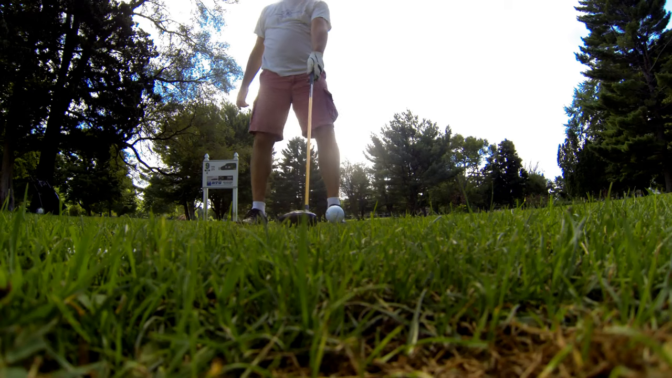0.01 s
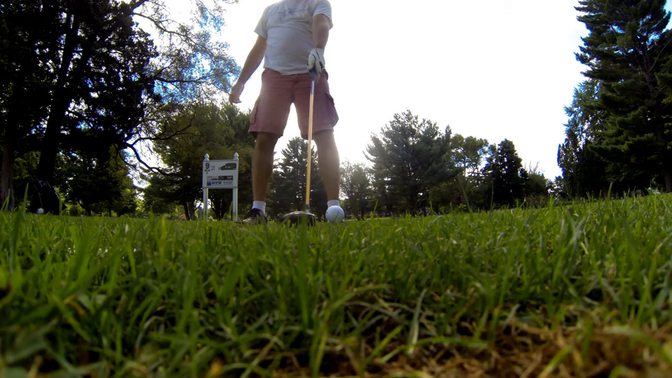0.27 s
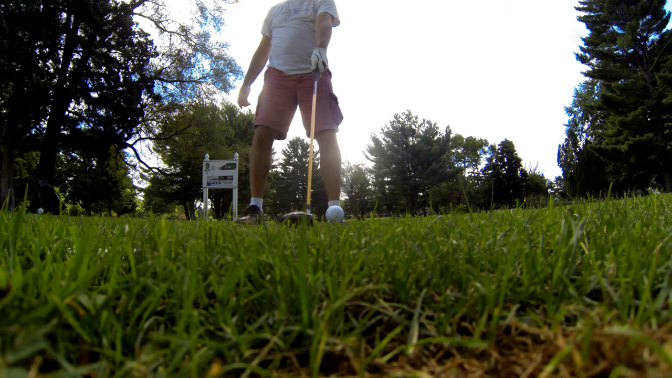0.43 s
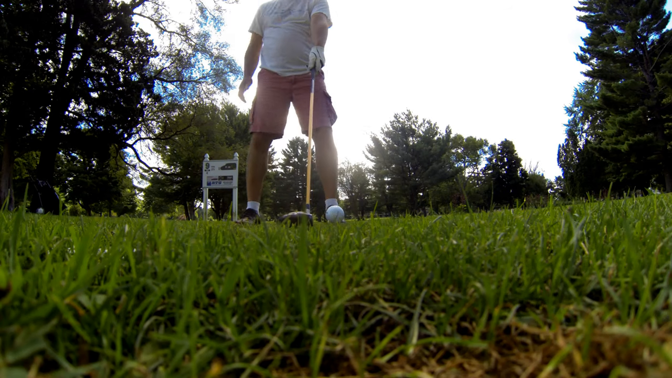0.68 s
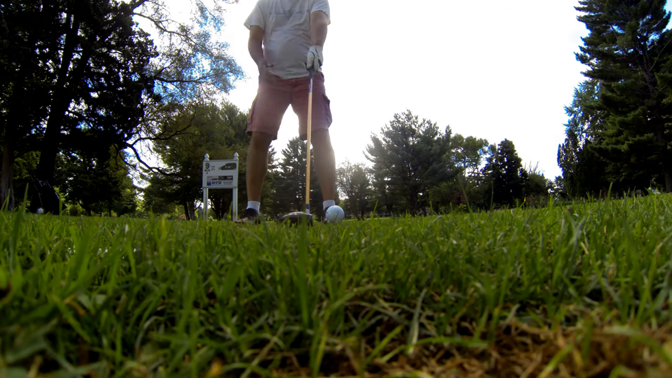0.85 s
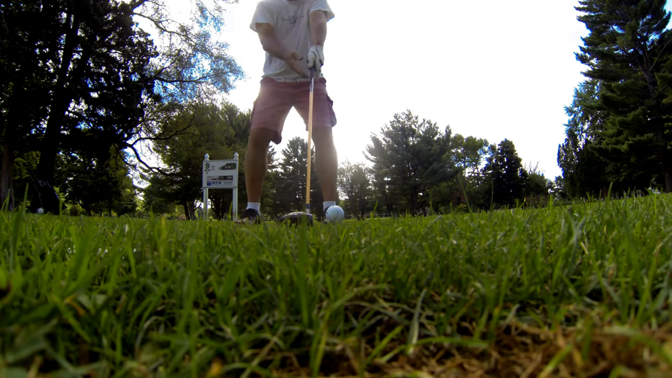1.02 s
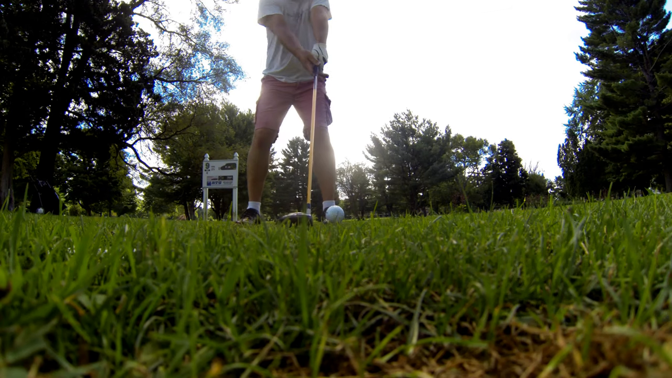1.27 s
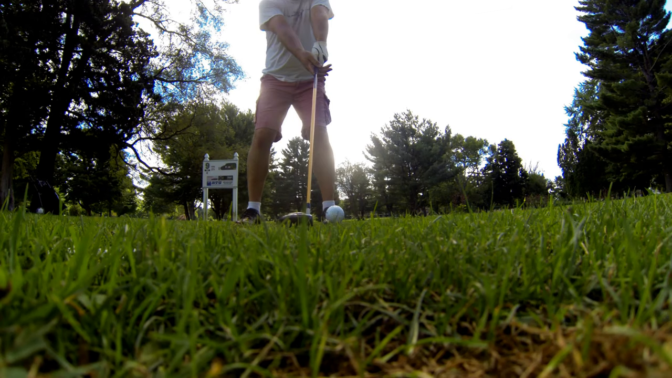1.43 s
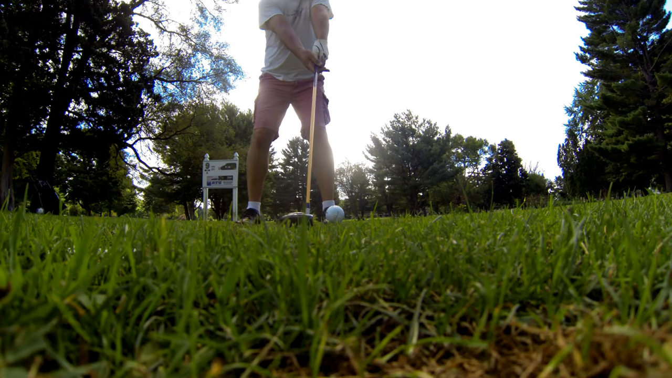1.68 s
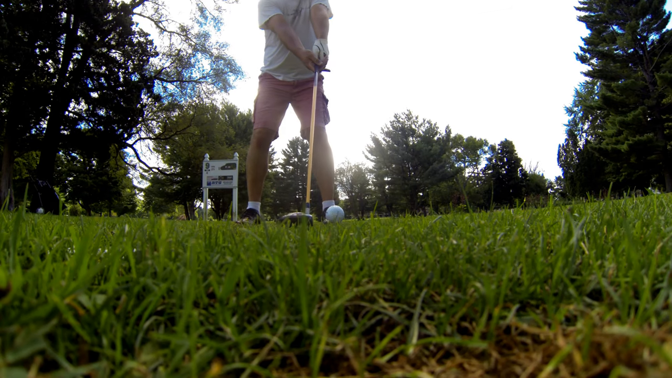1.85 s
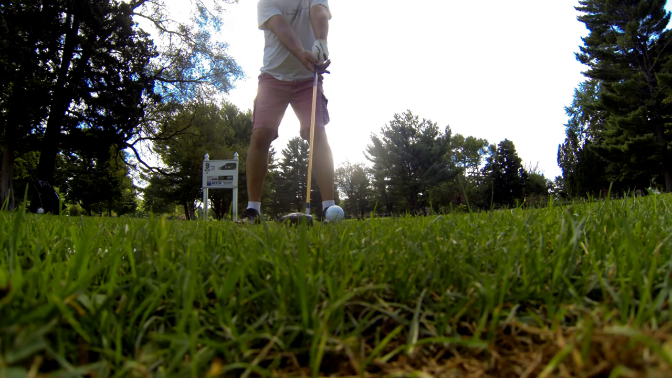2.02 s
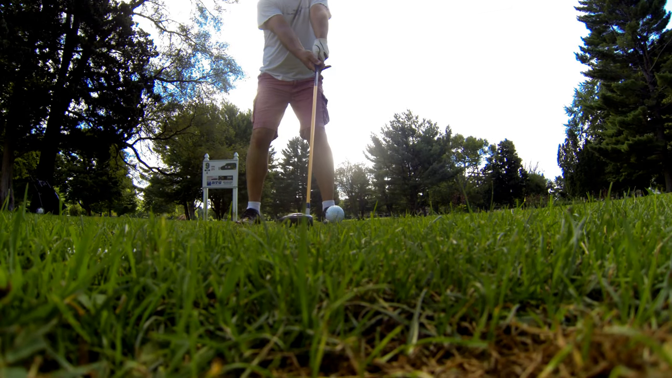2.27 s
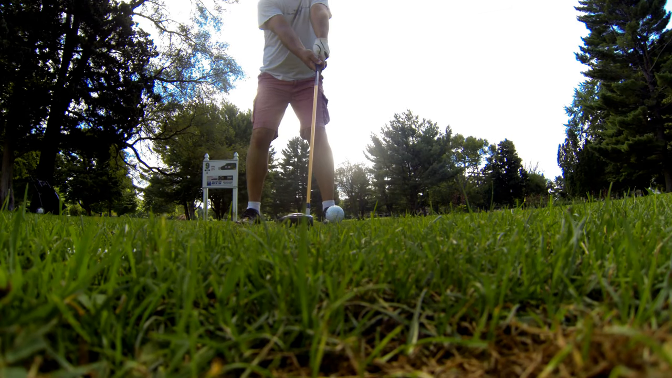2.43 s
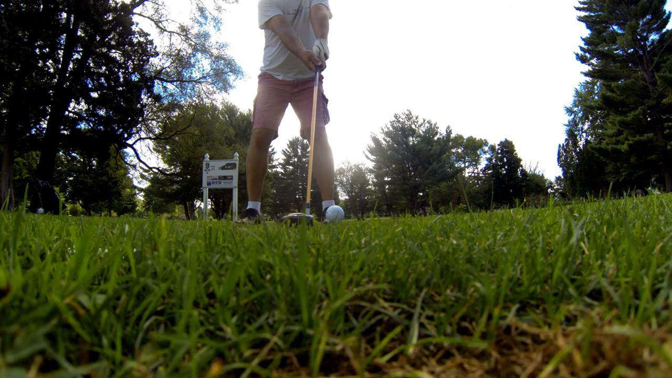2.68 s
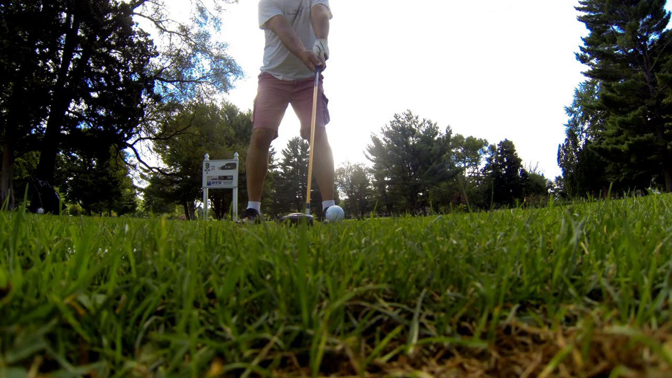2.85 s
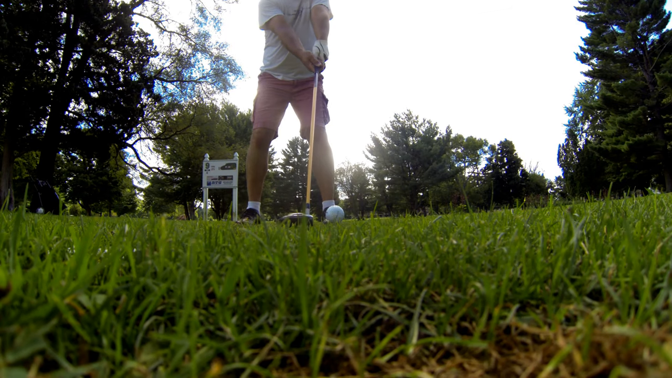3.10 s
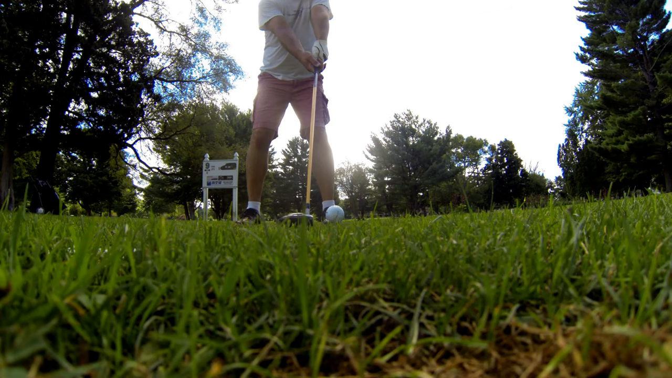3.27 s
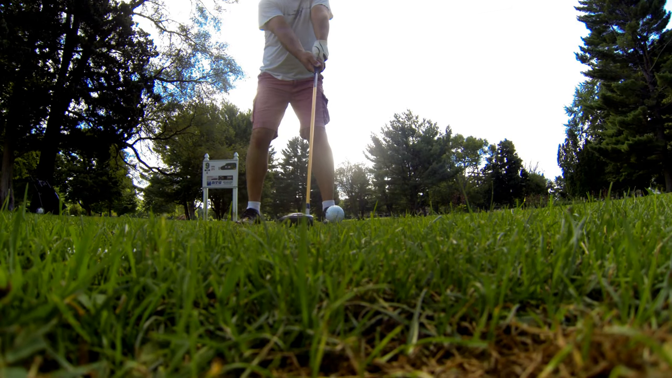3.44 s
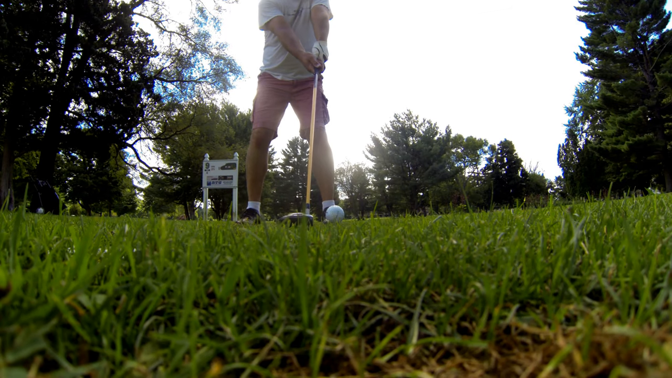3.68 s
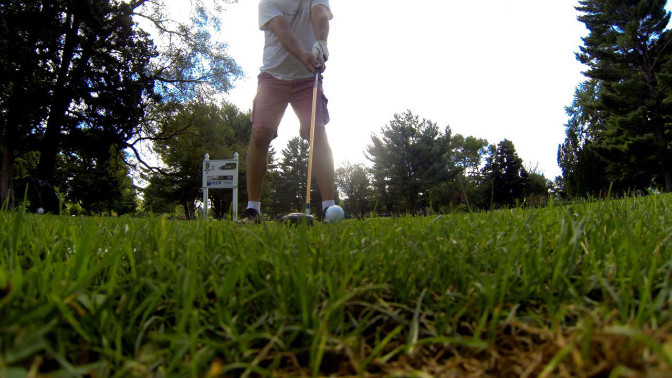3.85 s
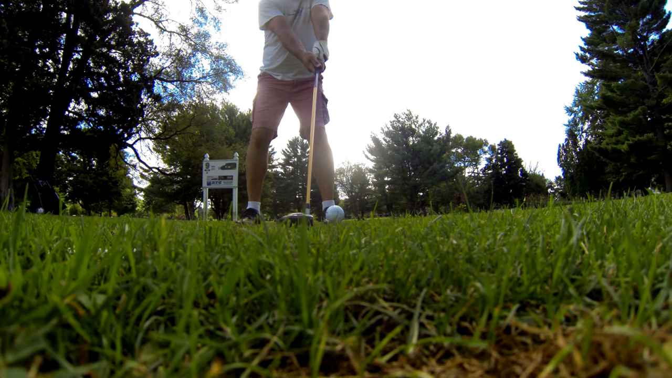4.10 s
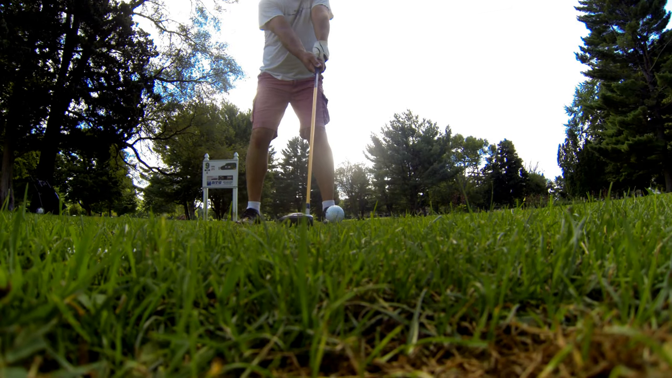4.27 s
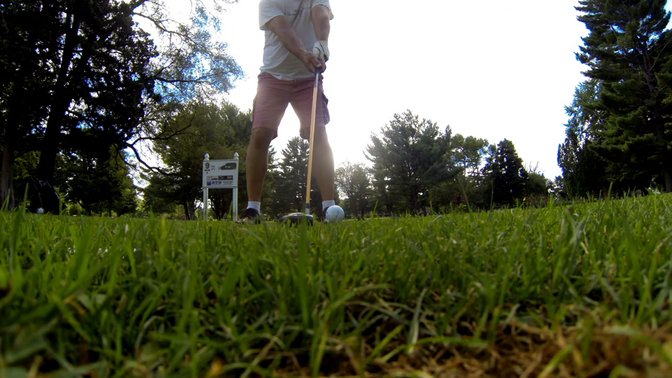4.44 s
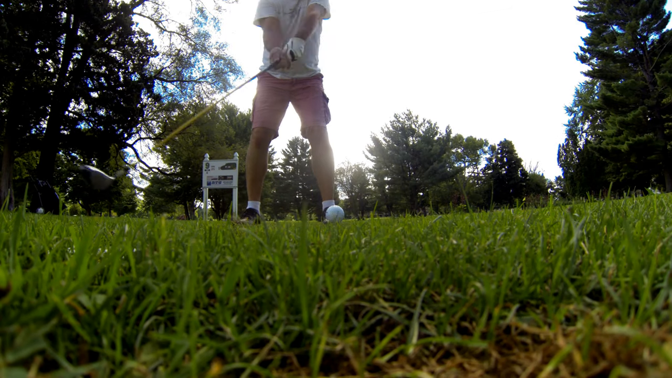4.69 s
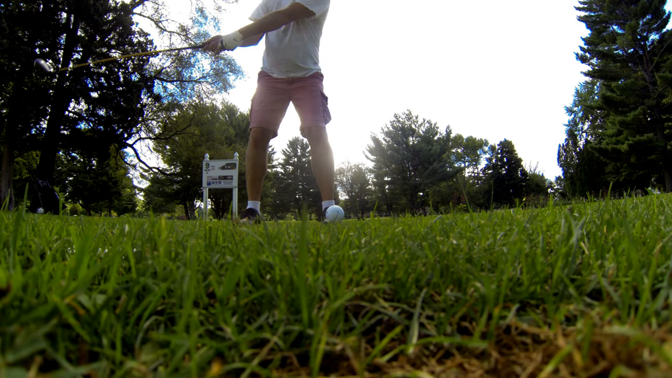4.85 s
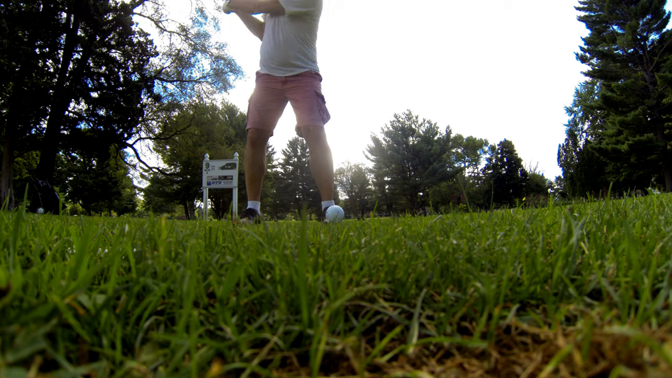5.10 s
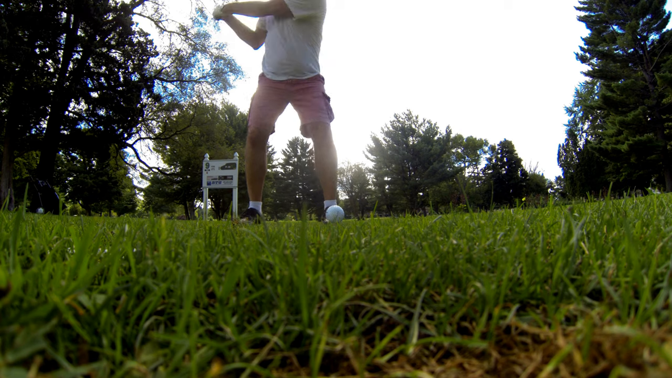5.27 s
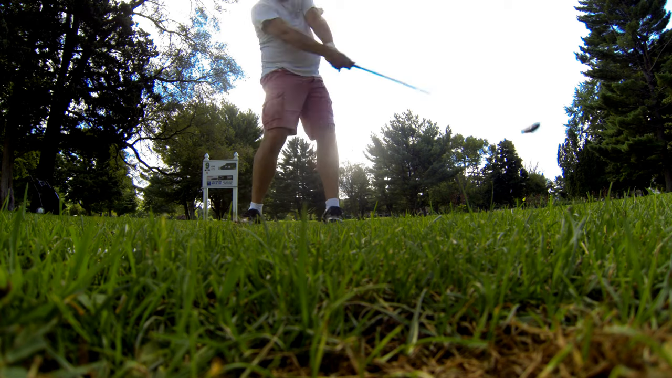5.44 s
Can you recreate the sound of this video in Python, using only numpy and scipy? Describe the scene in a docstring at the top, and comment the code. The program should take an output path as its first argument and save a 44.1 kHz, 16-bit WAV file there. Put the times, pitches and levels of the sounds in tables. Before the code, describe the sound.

A low, steady rumble of far traffic with a wavering hum fills a grassy golf course, with barely audible insects, birds and a thin pulsing whine. A few tiny scuffs come from the grass. Near the end a club whooshes down, hits the ball with a hard, loud crack and a short metallic ring, and trees throw back a bright wash. The microphone lies close by in the grass.

```python
"""Distant traffic rumbles throughout, with a wavering hum, faint insects, birds and a thin pulsing whine.
After a few scuffs in the grass a golf club swishes down, cracks against the ball and rings as it swings away.
Trees return a bright wash. Noise is shaped by its spectrum, the swish follows the speed of the head,
and the crack is a sum of decaying modes with noise, heard close by from a microphone lying in the grass."""
import sys
import numpy as np
from scipy import signal
from scipy.fft import rfft, irfft, next_fast_len
from scipy.io import wavfile

SR = 44100
rng = np.random.default_rng(int(sys.argv[2]) if len(sys.argv) > 2 else 0)


def unload_audio(sound):
    """Save the sound as a 16-bit wav file, at the path given as the first command line argument."""
    columns = np.transpose(np.atleast_2d(sound))
    # keep every value between -1 and 1, then stretch to whole-number steps
    steps = np.round(np.clip(columns, -1, 1) * 32767)
    wavfile.write(sys.argv[1], SR, steps.astype(np.int16))


N = 243431
TIME = np.arange(N) / SR   # s

# Relative spectrum of distant traffic and air: [frequency_hz, density_db]
RUMBLE_SPECTRUM = [(8.8, -59), (15, 1), (33, 1), (143, -2.5), (248, -9), (286, -13), (312, -13.5),
                   (589, -23.5), (810, -25.5), (3970, -45.5), (6120, -48), (7080, -49.5), (10000, -54),
                   (13800, -55.5), (15000, -73)]
RUMBLE_DB, RUMBLE_SWAY_DB = -41, 0.58   # mean level and spread of its slow sway
# Resonances of a far engine hum: [centre_hz, width_hz, level_db]
HUM_BANDS = [(78, 28, -52.5), (111.5, 12, -48.5), (143.4, 15, -48.5), (286.7, 4, -55.5), (443, 4.1, -68.5)]
# Insect buzzes, swelling slowly and stopping short: [start_s, end_s, level_db]
INSECT_BUZZES = [(1.1, 2.38, -78), (3.35, 4.52, -77)]
BUZZ_ATTACK_S, BUZZ_RELEASE_S = 0.46, .07
# Far bird calls, bell-shaped in time: [centre_s, spread_s, pitch_hz, width_hz, peak_level_db]
BIRD_CALLS = [(1.76, .06, 7300, 500, -80), (2.69, 0.0086, 2260, 300, -60.5), (3.01, .05, 7250, 500, -78),
              (4.39, .02, 5500, 200, -79), (4.458, .02, 5490, 70, -66.5), (4.82, .06, 7140, 700, -76.5)]
# Shoes and club shifting in the grass: [centre_s, spread_s, centre_hz, width_hz, peak_level_db]
GRASS_SCUFFS = [(.68, 0.011, 1020, 500, -57), (2.338, 0.0048, 4000, 8000, -67),
                (2.501, 0.0009, 1880, 1500, -55), (2.533, 0.0044, 1500, 1500, -54),
                (2.534, 0.0036, 5500, 6000, -68)]

# Stands of trees that return the crack as a wash: [return_s, level_db]
TREE_STANDS = [(5.26, -40.5), (5.32, -39.5), (5.365, -45)]
WASH_ATTACK_S, WASH_T60_S = 0.0083, 0.87
# Relative spectrum of the crack scattered by foliage: [frequency_hz, density_db]
FOLIAGE_SPECTRUM = [(150, -30), (400, -4), (900, -2), (1900, -6), (2650, -14), (3050, -12), (3300, -11),
                    (3480, -17), (4300, -9), (5800, -3), (8200, -12), (11300, -14), (13500, -22),
                    (15200, -29)]
# Dull echoes of the crack: [centre_s, spread_s, centre_hz, width_hz, peak_level_db]
DULL_ECHOES = [(5.2735, 0.0035, 1120, 1100, -27), (5.298, 0.0025, 1580, 400, -39),
               (5.341, 0.0074, 996, 700, -53), (5.436, 0.014, 1340, 1450, -43)]
# One pitch of the crack lingers among the trees
LINGER_HZ, LINGER_WIDTH_HZ, LINGER_DB, LINGER_T60_S = 3120, 250, -53, 2.2
DULLING_FROM_S, DULLING_S = 5.42, 0.12   # onset and time constant of the wash's loss of treble

# The swing: speed grows and fades exponentially about its fastest moment
FASTEST_S, SPEED_UP_S, SLOW_DOWN_S = 5.249, .079, 0.0667
CREST = 0.0804   # rounding of the top of the speed curve
# Relative spectrum of turbulence behind the club: [frequency_hz, density_db]
TURBULENCE_SPECTRUM = [(100, -6), (230, 0), (400, 1), (600, 1), (950, -4), (1750, -5), (2000, -12),
                       (2800, -14), (5000, -26), (8000, -29), (15000, -38)]
# Vortex tone and wake at top speed; amplitudes follow these powers of the speed
VORTEX_HZ, VORTEX_DB, VORTEX_POWER = 885, -17, 3.94
WAKE_DB, WAKE_POWER = -22.5, 5.1
SHEDDING_SPEED = 0.53   # share of top speed above which the vortices sing
BROKEN_DB = -4   # change in the tone once the ball is struck
UNSTEADY, UNSTEADY_HZ = 1, 150   # depth and rate of the shedding's flutter

IMPACT_S = 5.2577
# Pressure ahead of the head and suction behind, before smoothing; time for one to turn into the other
PUSH_DB, PUSH_S, SUCTION_DB, SUCTION_S, FLIP_S = -10.5, 0.0175, -13, 0.037, 0.0027

# Modes of club head and ball, close pairs beating; levels are relative, before the build-up,
# and pitches are those at contact: [pitch_hz, level_db, t60_s, build_up_s]
CLUB_MODES = [(230, -12, .02, .0001), (400, -11, .018, .0001), (600, -10, .014, .0001),
              (1150, -10, .022, .0001), (1510, -4, .016, .0005), (1730, -11, .016, .0005),
              (2625, 22, .0082, .0018), (3170, -10, .016, .0001), (3950, -4, .011, .0005),
              (4500, -16, .01, .0003), (5340, -23, .07, .0006), (5470, -17, .125, .0007),
              (5520, -14, .02, .0006), (7080, -36, .16, .0002), (7520, -16, .012, .0003),
              (9570, -28, .013, .0004), (10660, -23, .047, .001), (10870, -38, .08, .0008),
              (12550, -23, .025, .0003)]
# The receding ring sinks in pitch, then fades as the face turns aside
DOPPLER_SAG_PER_S, DOPPLER_LOWEST = 1.55, .937   # slope and floor of the pitch ratio
TURN_AFTER_S, TURN_S, TURNED_DB = .043, .004, -18
RING_FLUTTER, RING_FLUTTER_HZ = 0.21, 160   # the ring wavers in the wake

CUTOFF_HZ = 15200


def from_db(db):
    """Logarithmic level: twenty decibels are a factor of ten in amplitude."""
    return 10 ** (np.asarray(db) / 20)


def rms_one(x):
    """Normalization: the mean square is brought to one."""
    return x / np.sqrt(np.mean(x ** 2) + 1e-20)


def filtered(x, hz, kind, order=2):
    """Causal filtering with the maximally flat Butterworth response."""
    edges_hz = np.clip(hz, 10, .45 * SR)
    sections = signal.butter(order, edges_hz, kind, fs=SR, output="sos")
    return signal.sosfilt(sections, x + 1e-18)


def shaped_noise(gain_at):
    """Spectral shaping: white noise of any spectrum, returned at unit power."""
    size = next_fast_len(N)
    hz = np.arange(size // 2 + 1) * SR / size + 1   # the offset avoids zero frequency
    spectrum = rfft(rng.standard_normal(size)) * gain_at(hz)
    return rms_one(irfft(spectrum, size)[:N])


def coloured(spectrum):
    """Coloured noise: decibels interpolated along logarithmic frequency."""
    points_hz, db = np.transpose(spectrum)
    return shaped_noise(lambda hz: from_db(np.interp(np.log(hz), np.log(points_hz), db)))


def band_noise(centre_hz, width_hz):
    """Resonance: noise concentrated about one frequency, with steep skirts."""
    def gain_at(hz):
        detuning = (hz ** 2 - centre_hz ** 2) / (hz * width_hz)
        return 1 / (1 + detuning ** 2)
    return shaped_noise(gain_at)


def drift(rate_hz):
    """Random fluctuation: low-frequency noise with a spread of one."""
    return shaped_noise(lambda hz: 1 / (1 + (hz / rate_hz) ** 2))


def flutter(depth, rate_hz):
    """Random modulation: a complex gain of wavering strength and phase, with unit power."""
    wavering = 1 + depth * (drift(rate_hz) + 1j * drift(rate_hz))
    return wavering / np.sqrt(1 + 2 * depth ** 2)


def delayed(x, seconds):
    """Propagation delay: the same sound arrives later."""
    return np.interp(TIME - seconds, TIME, x, left=0)


def ramp(start, length):
    """Linear envelope from 0 to 1; with a negative length, a fall that ends at that time."""
    return np.clip((TIME - start) / length, 0, 1)


def dying(age, db, t60):
    """Exponential decay: the level falls 60 dB in each t60, from age zero."""
    return (age > 0) * from_db(db - 60 * np.minimum(age / t60, 3))


def swells(rows):
    """Gaussian envelopes: short bell-shaped bursts of band noise."""
    total = 0
    for centre_s, spread_s, hz, width_hz, db in rows:
        bell = np.exp(-.5 * ((TIME - centre_s) / spread_s) ** 2)
        total = total + from_db(db) * bell * band_noise(hz, width_hz)
    return total


def traffic():
    """Broadband noise with a slowly swaying level: the rumble of distant traffic."""
    level_db = RUMBLE_DB + RUMBLE_SWAY_DB * drift(1)
    return from_db(level_db) * coloured(RUMBLE_SPECTRUM)


def engine_hum():
    """Narrow-band noise: each resonance wavers the more slowly the narrower it is."""
    return sum(from_db(db) * band_noise(hz, width) for hz, width, db in HUM_BANDS)


def insects():
    """Amplitude modulation: a high band of noise swells slowly and stops short."""
    effort = 0
    for start, end, db in INSECT_BUZZES:
        effort = effort + from_db(db) * ramp(start, BUZZ_ATTACK_S) * ramp(end, -BUZZ_RELEASE_S)
    return effort * band_noise(centre_hz=12050, width_hz=3400)


def whine(level_db=-75, octave_db=-74, spread_s=0.0063):
    """Pulsed harmonics: a faint electronic tone and its octave, in twelve double blips a second."""
    pitch_hz, period_s = 7025, 1 / 11.986
    blips = 0
    for start_s in (.003, .031):
        from_centre = (TIME - start_s + period_s / 2) % period_s - period_s / 2
        blips = blips + np.exp(-.5 * (from_centre / spread_s) ** 2)
    phase = 2 * np.pi * pitch_hz * TIME
    return blips * (from_db(level_db) * np.sin(phase) + from_db(octave_db) * np.sin(2 * phase))


def birds():
    """Narrow-band bursts: far calls of short duration."""
    return swells(BIRD_CALLS)


def scuffs():
    """Friction noise: brief bursts as shoes and club shift in the grass."""
    return swells(GRASS_SCUFFS)


def tree_wash():
    """Diffuse scattering: the powers of the returns add, and their treble fades with time."""
    power = 0
    for return_s, db in TREE_STANDS:
        decay = dying(np.maximum(TIME - return_s, 0), db, WASH_T60_S)
        power = power + (ramp(return_s, WASH_ATTACK_S) * decay) ** 2
    wash = np.sqrt(power) * coloured(FOLIAGE_SPECTRUM)
    dull = filtered(wash, hz=3070, kind="low", order=1)
    bright = np.exp(-np.maximum(TIME - DULLING_FROM_S, 0) / DULLING_S)
    return bright * wash + (1 - bright) * dull


def lingering_pitch():
    """Resonant decay: one band of the crack outlasts the wash."""
    main_return_s = TREE_STANDS[1][0]
    age = np.maximum(TIME - main_return_s, 0)
    return dying(age, LINGER_DB, LINGER_T60_S) * band_noise(LINGER_HZ, LINGER_WIDTH_HZ)


def surroundings(crack):
    """Reflection and scattering: a near copy of the crack, dull echoes and the wash of the trees."""
    near = from_db(-16.5) * filtered(delayed(crack, seconds=.0122), hz=4000, kind="low")
    return near + swells(DULL_ECHOES) + tree_wash() + lingering_pitch()


def head_speed():
    """Kinematics of the swing: speed of the club head as a share of its top speed."""
    since = TIME - FASTEST_S
    away = np.maximum(-since / SPEED_UP_S, since / SLOW_DOWN_S)
    return np.exp(CREST - np.hypot(away, CREST))


def vortex_tone(speed):
    """Vortex shedding: pitch is proportional to speed and strength rises steeply with it."""
    phase = 2 * np.pi * np.cumsum(VORTEX_HZ * speed) / SR
    shedding = 1 / (1 + (SHEDDING_SPEED / (speed + 1e-6)) ** 20)
    level_db = VORTEX_DB + BROKEN_DB * ramp(IMPACT_S, FLIP_S)
    strength = from_db(level_db) * speed ** VORTEX_POWER * shedding
    # unsteady strength and timing widen the tone
    unsteady = flutter(UNSTEADY, UNSTEADY_HZ)
    return np.sqrt(2) * strength * np.real(unsteady * np.exp(1j * phase))


def wake_noise(speed, body_hz=1100):
    """Turbulence: the wake grows louder and brighter with the speed of the head."""
    wake = coloured(TURBULENCE_SPECTRUM)
    body = filtered(wake, body_hz, "low", order=1)
    brightness = speed ** 2
    return from_db(WAKE_DB) * speed ** WAKE_POWER * (brightness * wake + (1 - brightness) * body)


def swish():
    """Aerodynamic sound: shed vortices and turbulence governed by one speed curve."""
    speed = head_speed()
    return vortex_tone(speed) + wake_noise(speed)


def air_push():
    """Near-field pressure: it builds ahead of the head and flips to suction as it passes."""
    ahead = from_db(PUSH_DB) * ramp(IMPACT_S - PUSH_S, PUSH_S)
    behind = from_db(SUCTION_DB) * ramp(IMPACT_S + SUCTION_S, -SUCTION_S)
    pressure = np.where(TIME < IMPACT_S, ahead, behind) * np.tanh((IMPACT_S - TIME) / FLIP_S)
    return filtered(pressure, hz=400, kind="low")


def club_ring(age, level_db=-1.5):
    """Modal vibration with Doppler shift: decaying modes sink in pitch as the club recedes."""
    doppler = np.maximum(1 - DOPPLER_SAG_PER_S * age, DOPPLER_LOWEST)
    heard_age = np.cumsum(doppler * (age > 0)) / SR
    modes = 0
    for hz, db, t60, build_up in CLUB_MODES:
        envelope = dying(age, db, t60) * (1 - np.exp(-age / build_up)) ** 2
        modes = modes - envelope * np.exp(2j * np.pi * hz * heard_age)
    wavering = flutter(RING_FLUTTER * ramp(IMPACT_S, 0.014), RING_FLUTTER_HZ)
    away_db = TURNED_DB * ramp(IMPACT_S + TURN_AFTER_S, TURN_S)
    return np.imag(modes * wavering) * from_db(level_db + away_db)


def contact_snap(age):
    """Impact noise: a broad band that dies within milliseconds of contact."""
    noise = filtered(rng.standard_normal(N), [2800, 9000], "band", order=1)
    return dying(age, -16, t60=.015) * rms_one(noise)


def grass_spray(age):
    """Decaying broadband noise: a soft spray of grass."""
    noise = filtered(rng.standard_normal(N), hz=12100, kind="low")
    return dying(age, -33, t60=0.099) * rms_one(noise)


def strike():
    """Impulsive excitation: contact sets off the ring, the snap and the spray together."""
    age = np.maximum(TIME - IMPACT_S, 0)
    return club_ring(age) + contact_snap(age) + grass_spray(age)


def scene():
    """Superposition: the drive is added to the sounds of the course."""
    crack = strike()
    course = traffic() + engine_hum() + insects() + whine() + birds() + scuffs()
    drive = surroundings(crack) + swish() + air_push() + crack
    return (course + drive)[None]


def record(dry):
    """Saturation and band limiting: peaks are rounded at full scale and the top is cut."""
    rounded = dry / (1 + dry ** 6) ** (1 / 6)
    return signal.sosfilt(signal.butter(24, CUTOFF_HZ, fs=SR, output="sos"), rounded)


dry = scene()
out = record(dry)
unload_audio(out)
```